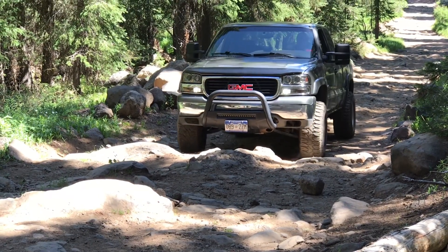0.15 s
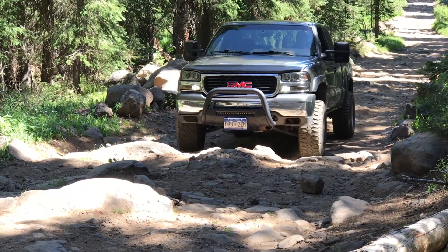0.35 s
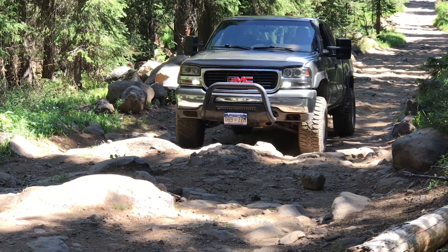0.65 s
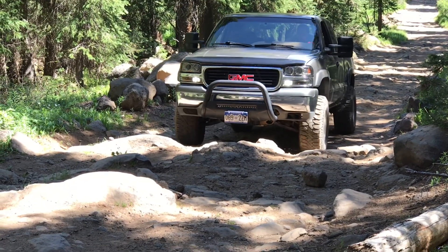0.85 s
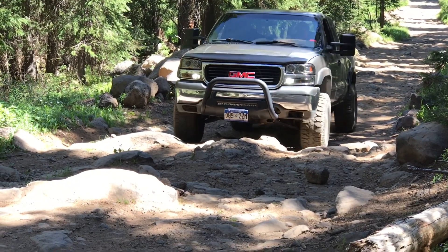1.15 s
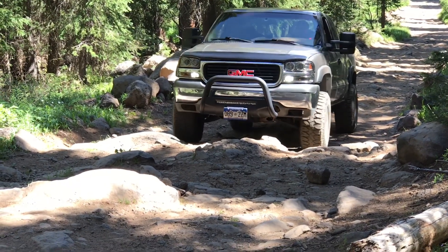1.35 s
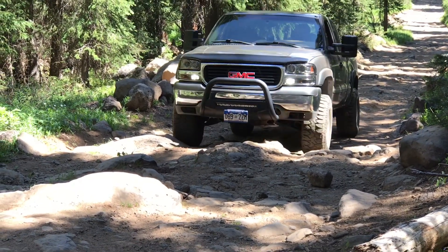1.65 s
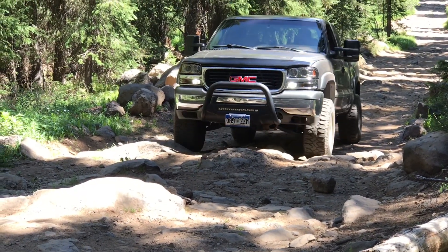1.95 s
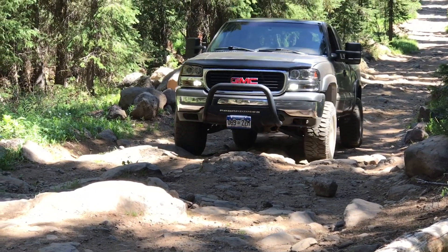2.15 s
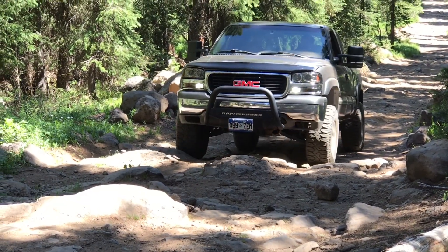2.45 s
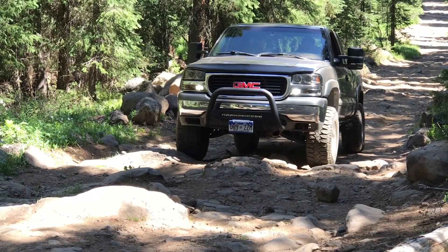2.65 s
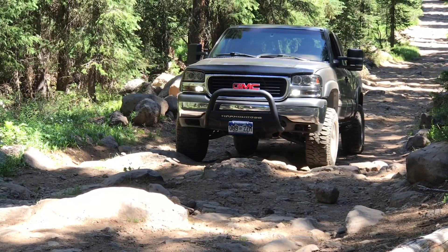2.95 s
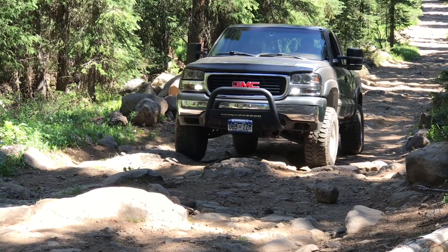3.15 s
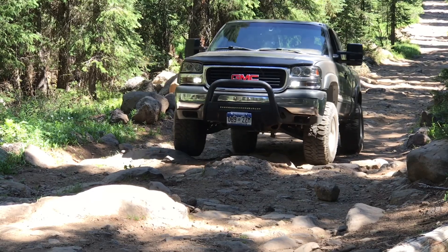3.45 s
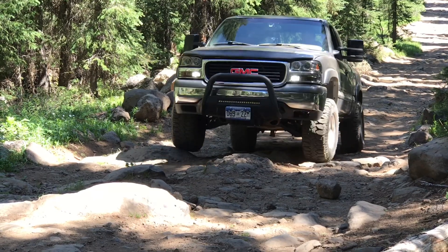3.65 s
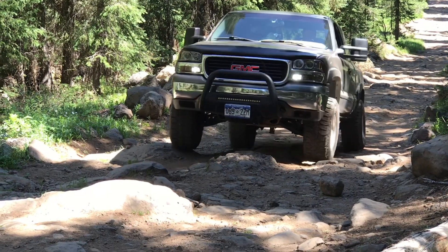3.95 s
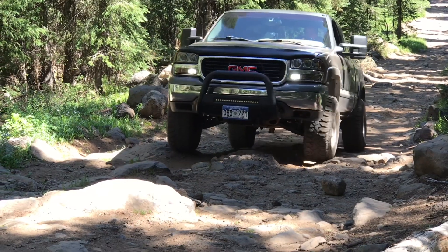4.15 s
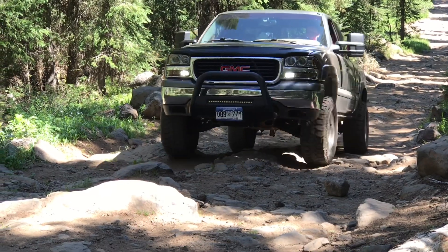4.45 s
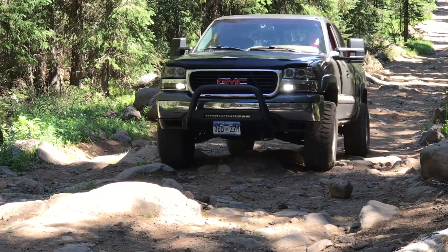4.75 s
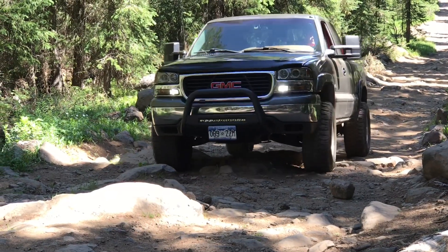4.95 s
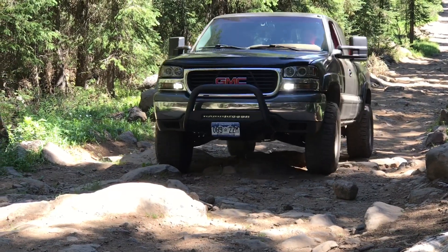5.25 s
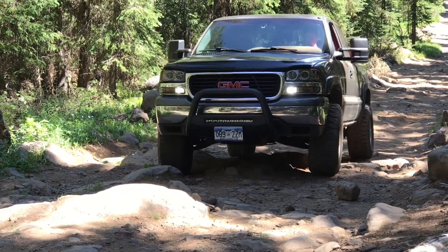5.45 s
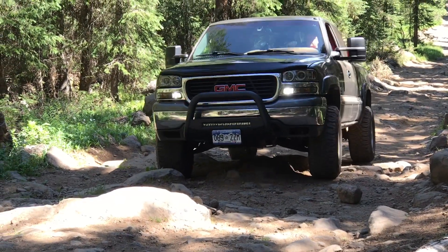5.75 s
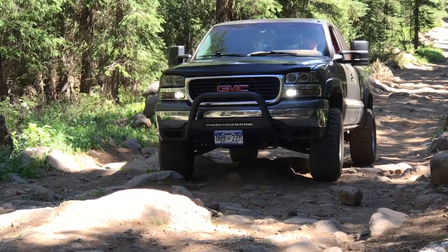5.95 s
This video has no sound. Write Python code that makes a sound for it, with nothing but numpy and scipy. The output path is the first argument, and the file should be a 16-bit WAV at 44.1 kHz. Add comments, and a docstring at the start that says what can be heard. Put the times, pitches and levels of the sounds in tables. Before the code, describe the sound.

Outdoors on a stony forest trail, a fixed mono microphone faces an approaching V8 pickup. Its deep, uneven exhaust burble revs up almost immediately, eases down, then surges higher and rougher just after the midpoint before settling to a slow lope. Fan whirr and thin air hiss sit above it. Stones knock, gravel crunches, loose chassis metal rattles and brakes squeak faintly over a low rumble of air.

```python
"""The uneven burble of a V8 pickup nearing on a forest trail, revved almost at once and again midway.
Puffs from two cylinder banks ring pipe resonances, and turbulent gas noise roughens the upper ones.
Coloured noise makes the fan and engine bay rush and the hiss of air past the throttle plate.
Under the tyres, damped notes knock as stones, ringing chips crunch as gravel and grainy noise scrubs.
Noise bursts rattle the chassis and wavering sines sing in the brakes, over a low rumble of air."""
import sys
import numpy as np
from scipy import signal
from scipy.fft import rfft, irfft
from scipy.io import wavfile
from scipy.ndimage import uniform_filter1d

SR = 44100
rng = np.random.default_rng(int(sys.argv[2]) if len(sys.argv) > 2 else 0)


def bounce(signal):
    """Save signal as a 16-bit WAV file at the path given by the first command-line argument."""
    frames = np.transpose(np.atleast_2d(signal))
    limited = np.clip(frames, -1, 1)
    pcm = np.round(limited * 32767).astype(np.int16)
    wavfile.write(sys.argv[1], SR, pcm)


N = 268569
TIME = np.arange(N) / SR  # [s]

# slow swell of the exhaust, howl aside, on top of its level laws: (time [s], level [dB])
EXHAUST_SWELL = [(0, 4.5), (.15, 0.5), (.3, 4), (.45, 4.5), (.65, 2.5), (.85, 3), (1.05, 1), (1.5, 0.5),
                 (2.2, 0.1), (2.7, 0.4), (2.98, 2.5), (3.16, 4.5), (3.4, 1.5), (3.85, 0.7), (4.15, 1.2),
                 (4.45, 1), (4.72, 2.5), (5.05, -1.5), (5.5, -0.4), (6.09, -0.5)]


def exhaust(turns, gas_s):
    """Puffs of somewhat uneven strength boom low; more ragged ones and turbulent gas roughen the upper resonances."""
    left, right = firings(turns, rough_db=3.5, jitter_s=0.00021)
    gas_flow = signal.lfilter([1], [1, -np.exp(-1 / (gas_s * SR))], left + right)
    gas = rms_one(gas_flow * rng.standard_normal(N))
    rough = left + from_db(-3) * gas
    notes = boom(turns) + bark(left, right, gas) + growl(rough) + rasp(rough) + drone(turns)
    return from_db(in_time(EXHAUST_SWELL)[0]) * notes + howl(rough)


# bank of each cylinder in firing order: (bank [0 left, 1 right])
BANKS = [0, 1, 0, 1, 1, 0, 1, 0]
# strength of each cylinder in firing order: (relative level [dB])
CYLINDER_DB = [0.43, -0.2, 0.52, 1, -0.3, -0.19, 0.11, -1.1]
RIGHT_BANK_LEAD_S = .0005


def firings(turns, rough_db, jitter_s):
    """One puff per firing, a row for each bank; the banks take turns unevenly, which makes the burble."""
    number = np.arange(np.ceil(turns[0]), turns[-1]).astype(int)
    cylinder = number % len(BANKS)
    bank = np.array(BANKS)[cylinder]
    chance = rng.standard_normal((len(number), 2))
    shift_s = jitter_s * chance[:, 0] - bank * RIGHT_BANK_LEAD_S
    at = np.searchsorted(turns, number) + (SR * shift_s).astype(int)
    strength_db = np.array(CYLINDER_DB)[cylinder] + rough_db * np.tanh(chance[:, 1])
    puffs = np.zeros((2, N))
    puffs[bank, np.clip(at, 0, N - 1)] = from_db(strength_db)
    return puffs / puffs.sum(axis=0).std()


# low exhaust pipe resonances: (frequency [Hz], width of each pass [Hz], level [dB],
# drive by the right bank relative to the left [ratio; negative = opposite sign])
BOOM_MODES = [(67.2, 23.4, 0.5, 1.12), (78, 17.6, -3.5, 2.47), (89.5, 25.1, 3, -1.19),
              (98.33, 10.4, 6, 0.19)]
# (level at crawl rate [dB], engine speed [dB/octave], full throttle [dB], nearing [dB/s]), as in every level law
BOOM_LEVEL = (-14.5, 5.5, 6, 0.2241)


def boom(turns):
    """Puffs with a little chance in strength and timing drive the lowest pipe resonances."""
    left, right = firings(turns, rough_db=2.2, jitter_s=0.00021)
    return loudness(BOOM_LEVEL) * pipes(left, right, BOOM_MODES)


# middle exhaust pipe resonances: (frequency [Hz], width of each pass [Hz], level [dB],
# drive by the right bank relative to the left [ratio; negative = opposite sign])
BARK_MODES = [(127.7, 18, -15.5, 2), (142.4, 15.3, -14.5, 2.1), (165.2, 5.1, 0.8, -0.23),
              (174.1, 14, 2.5, 0.08), (194.35, 13.5, -7, 2.24), (211, 5.4, -5.5, 0.7),
              (229.5, 21, -17, -1.1), (293.4, 23.5, -12.5, 0.12), (337.7, 9.7, -31.5, -2.1)]
# (level at crawl rate [dB], engine speed [dB/octave], full throttle [dB], nearing [dB/s])
BARK_LEVEL = (-12, 11, 3, 0.38)


def bark(left, right, gas):
    """Ragged puffs, with a little gas noise on the left bank, drive the middle pipe resonances."""
    return loudness(BARK_LEVEL) * pipes(left + from_db(-16.5) * gas, right, BARK_MODES)


# resonances roughened by turbulent gas: (frequency [Hz], width of each pass [Hz], relative level [dB])
GROWL_MODES = [(227, 22, 4.5), (296.2, 20.2, 4), (351.2, 18.5, 0), (408, 21, -4.5), (470, 15, -8.5)]
# (level at crawl rate [dB], engine speed [dB/octave], full throttle [dB], nearing [dB/s])
GROWL_LEVEL = (-56.5, 15, 7, 1.06)


def growl(rough):
    """Left-bank puffs and gas noise ring resonances between the boom and the rasp."""
    return loudness(GROWL_LEVEL) * evened(body(rough, GROWL_MODES))


# upper exhaust pipe resonances: (frequency [Hz], width of each pass [Hz], relative level [dB])
RASP_MODES = [(530, 43, 4), (573, 25, 3), (623, 37, -0.5), (811.4, 38, -1), (888, 85, -5)]
# (level at crawl rate [dB], engine speed [dB/octave], full throttle [dB], nearing [dB/s])
RASP_LEVEL = (-59.5, 21, 3.5, -0.33)


def rasp(rough):
    """The same puffs and gas noise ring the highest pipe resonances."""
    return loudness(RASP_LEVEL) * evened(body(rough, RASP_MODES))


# tailpipe resonances that the even firing harmonics sweep through: (frequency [Hz], width [Hz], level [dB])
DRONE_MODES = [(137, 10.3, 0.5), (163.8, 12.4, -2), (202.7, 4, 0)]
# (level at crawl rate [dB], engine speed [dB/octave], full throttle [dB], nearing [dB/s])
DRONE_LEVEL = (-41, 14, 0.5, 0)


def drone(turns):
    """Both banks join in the tailpipe; a clean firing harmonic swells as it meets a resonance."""
    rate = in_time(SPEED)[0]
    out = np.zeros(N)
    for order in range(2, 5):
        gain = np.zeros(N)
        for hz, width, db in DRONE_MODES:
            gain += from_db(db) / (1 + (2 * (order * rate - hz) / width) ** 2)
        out += gain * np.cos(2 * np.pi * order * turns)
    return np.sqrt(2) * loudness(DRONE_LEVEL) * out


# narrow pipe resonance near the top of the rev:
# (time [s], length [s], frequency [Hz], width of each pass [Hz], level at mid-swell [dB])
HOWL = (3.62, 0.6, 526, 30, -52)


def howl(rough):
    """One narrow pipe resonance swells and fades, driven by the puffs and gas noise."""
    s, length, hz, width, db = HOWL
    return from_db(db) * hump(s, length) * evened(body(rough, [(hz, width, 0)]))


# engine speed: (time [s], rate [firings/s])
SPEED = [(0.0, 32.8), (0.15, 33.75), (0.3, 41.95), (0.45, 49.32), (0.58, 51.69), (0.7, 53.31), (0.85, 49.6),
         (1.05, 48.22), (1.25, 46.74), (1.45, 44.65), (1.65, 42.23), (1.95, 40.63), (2.25, 38.6),
         (2.45, 39.19), (2.7, 40.5), (2.88, 41.2), (3.05, 51.72), (3.2, 57.45), (3.4, 64.51), (3.6, 65.06),
         (3.8, 72.4), (3.92, 68.85), (4.05, 63.6), (4.2, 55.3), (4.45, 52.36), (4.7, 52.75), (4.9, 49.87),
         (5.12, 45.15), (5.3, 39.88), (5.5, 37.01), (5.8, 32.55), (6.09, 32.56)]
START_TURNS = 1.3  # engine phase at the start [firings]


def engine_turns():
    """Summing the firing rate gives the engine's phase, counted in firings."""
    return START_TURNS + np.cumsum(in_time(SPEED)[0]) / SR


# pushes of the throttle: (time [s], time until the lift [s], depth [0-1])
PUSHES = [(.14, 0.57, 0.5), (2.78, 1.04, 0.5), (4.45, 0.25, 0)]
PRESS_S, LIFT_S = 0.16, 0.19


def throttle():
    """Each push is pressed, held and lifted."""
    opening = np.zeros(N)
    for s, held, depth in PUSHES:
        press = (TIME - s) / PRESS_S
        lift = 1 - (TIME - s - held) / LIFT_S
        opening += depth * np.clip(np.minimum(press, lift), 0, 1)
    return opening


CRAWL_RATE = 50  # engine speed at which a level law has no speed gain [firings/s]


def loudness(law):
    """A layer's gain follows engine speed and throttle, and shifts steadily as the truck nears."""
    db, db_per_octave, throttle_db, db_per_s = law
    octaves = np.log2(in_time(SPEED)[0] / CRAWL_RATE)
    return from_db(db + db_per_octave * octaves + throttle_db * throttle() + db_per_s * TIME)


# engine bay resonances: (frequency [Hz], width of each pass [Hz], relative level [dB])
BAY_MODES = [(1519, 320, 1), (1989, 98, -2.5), (2084, 170, -4.5), (3015, 72, -2.5), (3397, 480, -7),
             (4250, 220, -12), (4960, 620, -15)]
# colour of the fan and valve-train whirr: (frequency [Hz], relative density [dB per Hz])
WHIRR = [(450, 4), (800, -3), (1150, -6.5), (1600, -8.5), (2100, -7), (2620, -21.5), (3050, -8),
         (3500, -6.5), (3900, -12.5), (4400, -11.5), (5500, -31), (6500, -13)]
# colour of the high hiss: (frequency [Hz], relative density [dB per Hz])
HISS = [(3240, -19), (5500, 3.5), (5980, -9), (6830, -2.5), (7490, -4.5), (8860, -2), (10300, -10.5),
        (12100, -4.5), (15800, -4)]
# air drawn past the open throttle: (frequency [Hz], width of each pass [Hz], relative level [dB])
INTAKE_MODES = [(3320, 620, 3), (2130, 700, -2.5)]
# each level: (level at crawl rate [dB], engine speed [dB/octave], full throttle [dB], nearing [dB/s])
WHIRR_LEVEL = (-62.5, 9, 4.5, 1)
INTAKE_LEVEL = (-79, 13, 25, 1.4)
HISS_LEVEL = (-75, 3, 6.5, 0.84)


def engine_bay(turns, pulsing, ring_db, flutter_db):
    """Whirr and intake air pulse with the firings, coloured by the metal around them; the hiss is steadier."""
    pulse = (1 + pulsing * np.cos(2 * np.pi * turns)) * from_db(flutter_db * drift(25))
    metal = rms_one(body(rng.standard_normal(N), BAY_MODES))
    whirr = rms_one(noise(WHIRR) + from_db(ring_db) * metal)
    intake = rms_one(body(rng.standard_normal(N), INTAKE_MODES))
    pulsed = (loudness(WHIRR_LEVEL) * whirr + loudness(INTAKE_LEVEL) * intake) * pulse
    return pulsed + loudness(HISS_LEVEL) * noise(HISS)


def underbody(x, wet_db, decay_s, size=2048):
    """Many short paths between frame and ground carve a fine, steady pattern into the spectrum."""
    paths = rng.standard_normal(size) * np.exp(-TIME[:size] / decay_s)
    wet = from_db(wet_db)
    reflected = signal.fftconvolve(x, paths / np.linalg.norm(paths))[:N]
    return (x + wet * reflected) / np.hypot(1, wet)


# air hissing past the throttle plate: (time [s], length [s], level at mid-swell [dB])
GASPS = [(0.1, 0.22, -72), (2.76, 0.5, -72), (3.15, 0.6, -73)]
# colour of that hiss: (frequency [Hz], relative density [dB per Hz])
GASP_COLOUR = [(5000, 0), (9000, -3), (10500, -5), (12500, 4), (15500, 7)]


def gasps():
    """Air past the throttle plate makes a thin noise that swells and fades."""
    swell = sum(from_db(db) * hump(s, length) for s, length, db in GASPS)
    return swell * noise(GASP_COLOUR)


# stones popping under the tyres: (time [s], direct peak level [dB], pitch [Hz], decay [cycles])
KNOCKS = [(0.088, -40, 1300, 0.9), (0.088, -44.5, 570, 2), (0.372, -43, 878, 4.9), (.4121, -42, 880, 2.5),
          (0.478, -40.5, 1610, 1.5), (0.775, -30.5, 637, 1), (0.779, -40, 1060, 0.8), (.785, -41, 610, 1.7),
          (1.015, -40, 1130, 1.04), (1.399, -49, 3700, 3.3), (1.6818, -44, 900, 1.5),
          (1.712, -42, 1470, 1.6), (1.748, -39.5, 1050, 1.1), (2.121, -39.5, 920, 0.91),
          (3.2649, -31, 536, 3.9), (3.3927, -33, 552, 2.2), (3.458, -39, 810, 1.7),
          (3.878, -37.5, 1471, 2.8), (4.248, -40, 1290, 0.85), (4.8284, -42, 725, 1.2),
          (4.979, -35, 860, 0.99), (5.418, -40, 1950, 5), (5.7105, -37, 805, 2)]
GRIT_PER_S = 71  # at looseness 1


def stones(grit_db, spread_db):
    """Loose stones pop, and small grit ticks at random under the tread, harder as the truck pulls."""
    out, pull = np.zeros(N), loudness(WHIRR_LEVEL)
    for s, db, hz, cycles in KNOCKS:
        add(out, s, from_db(db) * knock(hz, cycles))
    born = np.flatnonzero(rng.random(N) < GRIT_PER_S * looseness() / SR)
    for at, (pitch, size) in zip(born, rng.random((len(born), 2))):
        gain = pull[at] * from_db(grit_db + spread_db * size ** 2)
        add(out, at / SR, gain * knock(650 * 4 ** pitch, cycles=0.81))
    return out


def knock(hz, cycles, size=4000):
    """A stone tips against its bed: a damped note with a brief higher partial and a crunch of grit."""
    t = np.arange(size) / SR
    fade = np.exp(-t * hz / cycles)
    note = fade * np.sin(2 * np.pi * hz * t)
    partial = 0.59 * fade ** 2 * np.sin(2 * np.pi * hz * 1.61 * t)
    grit = resonate(resonate(rng.standard_normal(size), hz, 2.0 * hz), hz, 2.0 * hz)
    tap = note + partial + from_db(-16.5) * rms_one(grit) * np.exp(-t / 0.0031)
    tap = tap * (1 - np.exp(-t / 0.0005))  # soft contact
    tap = signal.sosfilt(signal.butter(2, min(1.3 * hz, SR / 3), fs=SR, output="sos"), tap)
    return tap / np.abs(tap).max()


# stretches of loose ground under the tyres: (middle time [s], half length [s], looseness [0-1])
LOOSE_GROUND = [(1.204, 0.99, .42), (5.087, 0.98, 0.7)]


def looseness():
    """The tyres roll into each loose stretch and out again."""
    return sum(loose * np.exp(-((TIME - s) / half) ** 2) for s, half, loose in LOOSE_GROUND)


# gravel giving way: (level at crawl rate [dB], engine speed [dB/octave], full throttle [dB], nearing [dB/s])
CRUNCH_LEVEL = (-69, 8.5, 10.5, 0.99)
CRUSHES_PER_S, CRUSH_S = 22, .012  # mean rate, decay time
CHIPS_PER_S = 2500  # at the full strength of a crush, over a thin steady trickle


def crunch(spread_db, cycles, low_hz, high_hz, count=14):
    """Gravel gives way under the driven tyres in little crushes, each a shower of chips of many pitches."""
    crushes = (rng.random(N) < CRUSHES_PER_S / SR) * 1.0
    shower = signal.lfilter([1], [1, -np.exp(-1 / (CRUSH_S * SR))], crushes + 1e-18)
    shower = np.minimum(shower, 1)
    hits = rng.random(N) < CHIPS_PER_S * (shower + .08) / SR
    chips = hits * from_db(spread_db * rng.uniform(-0.65, 1, N)) * rng.choice([-1, 1], N)
    dealt = rng.integers(0, count, N)  # which pitch each chip gets
    rings = np.zeros(N)
    for k, hz in enumerate(np.geomspace(low_hz, high_hz, count)):
        rings += resonate(chips * (dealt == k), hz, hz / cycles) / hz
    return loudness(CRUNCH_LEVEL) * rms_one(rings)


# colour of tread scrubbing on rock: (frequency [Hz], relative density [dB per Hz])
SCRUB = [(480, -8), (620, 3), (850, -2), (1200, -8), (1600, -4), (2200, -18)]


def scrub(level_db, clump_db):
    """The tread slips over rock in uneven clumps, louder where the ground is loose."""
    clumps = rms_one(from_db(clump_db * (np.tanh(drift(25)) + np.tanh(drift(300)))))
    return from_db(level_db) * looseness() * clumps * noise(SCRUB)


# tread crunching over a rock edge: (time [s], length [s], level before fades [dB], centre [Hz])
SCUFFS = [(0.371, 0.094, -67, 870), (1.505, 0.061, -59, 1670), (2.06, 0.042, -55, 1470),
          (3.457, 0.014, -49, 3300), (4.251, 0.01, -46, 1310), (4.825, 0.072, -52, 744),
          (5.289, 0.064, -56, 570), (5.405, 0.038, -57, 1830)]


def scuffs(width_share, grain_db):
    """Each scuff is a short, grainy run of slips, coloured around one pitch."""
    out = np.zeros(N)
    for s, length, db, hz in SCUFFS:
        size = int(max(length, .005) * SR)
        white, grain = rng.standard_normal((2, SR // 4))[:, :size]
        slips = white * from_db(grain_db * np.repeat(np.tanh(grain), 64)[:size])  # 64-sample grains
        width = width_share * hz
        coloured = rms_one(resonate(resonate(slips, hz, width), hz, width))
        add(out, s, from_db(db) * signal.windows.tukey(size) * coloured)
    return out


# chassis rattles: (time [s], relative crack level [dB], decay time [s])
RATTLES = [(0.653, -58.5, 0.017), (1.71, -64, 0.036), (3.086, -60.5, 0.099), (3.137, -56, 0.076),
           (3.348, -59, 0.039), (3.613, -52, 0.038), (3.681, -56, 0.051), (3.735, -49, 0.019),
           (3.786, -59, 0.012), (3.926, -54, 0.014), (4.054, -52, 0.024), (4.245, -54.5, 0.03),
           (4.302, -58, 0.032), (4.487, -55.5, 0.071), (4.739, -56.5, 0.03), (4.879, -51, 0.026),
           (5.086, -56, 0.029), (5.139, -63, 0.055), (5.323, -63, 0.087), (5.582, -56.5, 0.026),
           (5.781, -67, 0.043), (6.038, -67, 0.025)]
# colour of the crack: (frequency [Hz], relative density [dB per Hz])
CRACK = [(2000, 12.6), (4000, 19), (5500, 13.6), (7000, 13), (9000, 9.4), (10500, 5.8), (12500, 9),
         (15500, 6.1)]
FRAME_DB, FRAME_FOLLOWS = -12, 0.66  # frame ring under a 0 dB crack [dB]; its change [dB per dB of crack]


def rattles(tick_db, grain_db, chatter_db, chatter_per_s):
    """Metal contacts: a first tick, a bright crack with sharp chatter in it and a ring of the frame."""
    crack, ring = np.zeros(N), np.zeros(N)
    t = TIME[:SR // 4]
    for s, peak_db, length in RATTLES:
        fade = (1 - np.exp(-t / 0.0012)) * np.exp(-t / max(length, .003))
        tick = from_db(tick_db) * np.exp(-t / 0.00025)
        add(crack, s, from_db(peak_db) * (fade + tick))
        add(ring, s, from_db(FRAME_DB + FRAME_FOLLOWS * peak_db) * fade)
    grains = rms_one(from_db(grain_db * np.minimum(drift(2300), 2)))
    clicks = (rng.random(N) < chatter_per_s / SR) * rng.uniform(-0.44, 1, N)
    chatter = rms_one(resonate(clicks, 12000, 9000))
    bright = from_db(-1.5) * grains * noise(CRACK) + from_db(chatter_db) * chatter
    frame = rms_one(body(rng.standard_normal(N), BAY_MODES))
    return crack * bright + ring * frame


# reflections from ground and trunks: (delay [s], level [dB])
ECHOES = [(.011, -15), (.029, -20), (.047, -22), (.083, -26)]


def forest(x):
    """Ground and trunks return a few dull echoes."""
    dull = signal.sosfilt(signal.butter(1, 4000, fs=SR, output="sos"), x)
    return x + sum(from_db(db) * np.interp(TIME - delay, TIME, dull, left=0) for delay, db in ECHOES)


# brake squeals, before their waver:
# (time [s], length [s], starting pitch [Hz], settled pitch [Hz], level at mid-swell [dB])
SQUEALS = [(1.184, 0.4, 4370, 4460, -71.5), (1.655, .24, 4200, 4220, -69), (2.081, 0.4, 4080, 4200, -69.5),
           (3.506, 0.89, 4220, 4330, -74), (4.38, 0.43, 4360, 4460, -73), (5.442, 0.24, 4120, 4230, -66)]


def brakes():
    """Each squeal is a faint sine that glides to a settled pitch, wavering in pitch and level."""
    out = np.zeros(N)
    for s, length, start_hz, settled_hz, db in SQUEALS:
        progress = np.clip((TIME - s) / length, 0, 1)
        swell = hump(s, length) * from_db(1.2 * drift(30))
        glide = settled_hz + (start_hz - settled_hz) * (1 - progress) ** 3
        hz = glide + 4 * drift(30) + 18 * drift(400)
        out += from_db(db) * swell * np.sin(2 * np.pi * np.cumsum(hz) / SR)
    return out


def air():
    """A steady low rumble of air lies behind everything, as noise weighted to the bass."""
    return from_db(-49.0) * noise([(20, -3.0), (45, 2.5), (200, -4.0), (600, -27.5), (1500, -34.0)])


def from_db(db):
    """Decibels to gain."""
    return 10 ** (np.asarray(db) / 20)


def rms_one(x):
    """Scale to unit rms."""
    return x / np.sqrt(np.mean(x ** 2) + 1e-20)


def in_time(rows):
    """Each column of a curve at every sample."""
    s, *columns = np.transpose(rows)
    return [np.interp(TIME, s, c) for c in columns]


def hump(s, length):
    """Half-sine swell from 0 to 1 and back."""
    return np.sin(np.pi * np.clip((TIME - s) / length, 0, 1))


def evened(x, size=9000):
    """Take out the slow level and keep the throb."""
    power = uniform_filter1d(uniform_filter1d(x * x, size), size)
    return x / np.sqrt(power + 1e-20)


def drift(rate):
    """Random wander of unit rms, with the given number of knots per second."""
    knots = np.arange(0, TIME[-1] + 1, 1 / rate)
    return rms_one(np.interp(TIME, knots, rng.standard_normal(len(knots))))


def resonate(x, hz, width):
    """One resonance of gain 1."""
    r = np.exp(-np.pi * width / SR)
    poles = [1, -2 * r * np.cos(2 * np.pi * hz / SR), r * r]
    return signal.lfilter(np.array([1, 0, -1]) * (1 - r * r) / 2, poles, x + 1e-18)


def body(x, modes, size=4000):
    """Parallel resonances, already ringing at the start, each applied twice for dark valleys."""
    x = np.pad(x, (size, 0), "reflect")
    rings = sum(from_db(db) * resonate(resonate(x, hz, width), hz, width) for hz, width, db in modes)
    return rings[size:]


def pipes(left, right, modes):
    """Each bank drives each pipe resonance with its own strength and sign."""
    return sum(body(left + drive * right, [(hz, width, db)]) for hz, width, db, drive in modes)


def noise(spectrum):
    """Steady noise of a given colour and unit rms, falling steeply outside it."""
    hz, db = np.transpose(spectrum)
    f = np.maximum(np.arange(N // 2 + 1) * SR / N, 1)
    skirts = 1 / np.sqrt((1 + (hz[0] / f) ** 8) * (1 + (f / hz[-1]) ** 16))
    colour = from_db(np.interp(np.log(f), np.log(hz), db))
    return rms_one(irfft(rfft(rng.standard_normal(N)) * skirts * colour, N))


def add(track, s, sound):
    """Mix a sound in at a time."""
    start = int(np.clip(s * SR, 0, N - 1))
    track[start:start + len(sound)] += sound[:N - start]


def scene():
    """The truck nears on the trail, its tyres and brakes over a low rumble of air."""
    turns = engine_turns()
    bay = engine_bay(turns, pulsing=0.06, ring_db=-6.5, flutter_db=1.25)
    bay = underbody(bay, wet_db=-8, decay_s=.012)
    contacts = stones(grit_db=6, spread_db=8)
    contacts += crunch(spread_db=2, cycles=4.1, low_hz=1300, high_hz=4150)
    contacts += scrub(level_db=-53.0, clump_db=4.5)
    contacts += scuffs(width_share=0.49, grain_db=8)
    contacts += rattles(tick_db=9.0, grain_db=-3.0, chatter_db=-13.5, chatter_per_s=460)
    return (exhaust(turns, gas_s=0.017) + bay + gasps() + forest(contacts) + brakes() + air())[None]


CUTOFF_HZ = 15800


def record(dry):
    """The single microphone channel loses its top steeply above the cutoff."""
    return signal.sosfilt(signal.ellip(10, .1, 80, CUTOFF_HZ, fs=SR, output="sos"), dry)


dry = scene()
out = record(dry)
bounce(out)
```